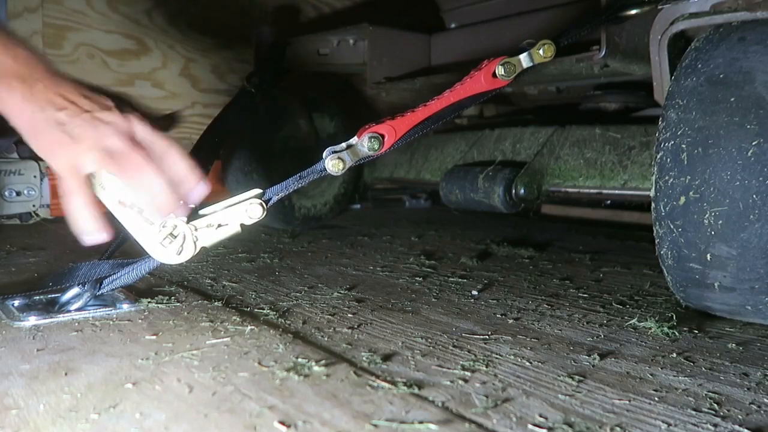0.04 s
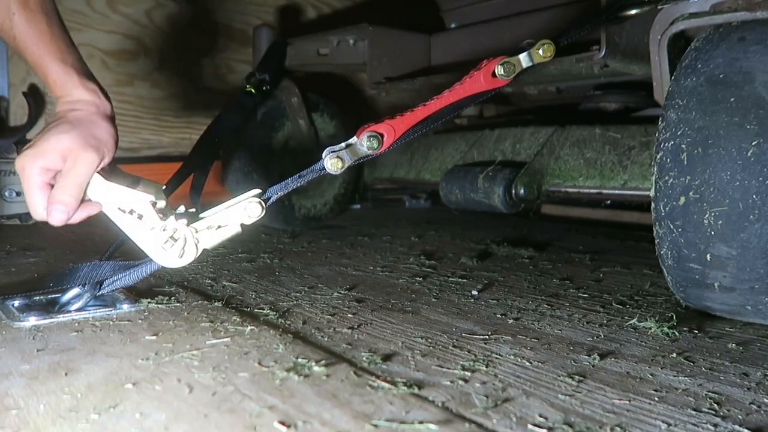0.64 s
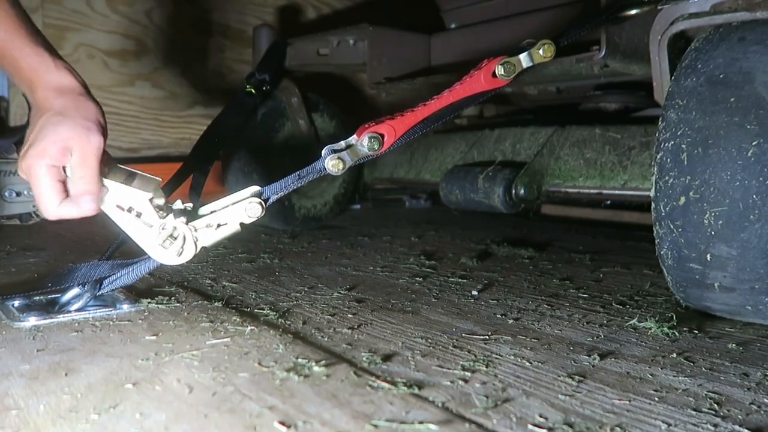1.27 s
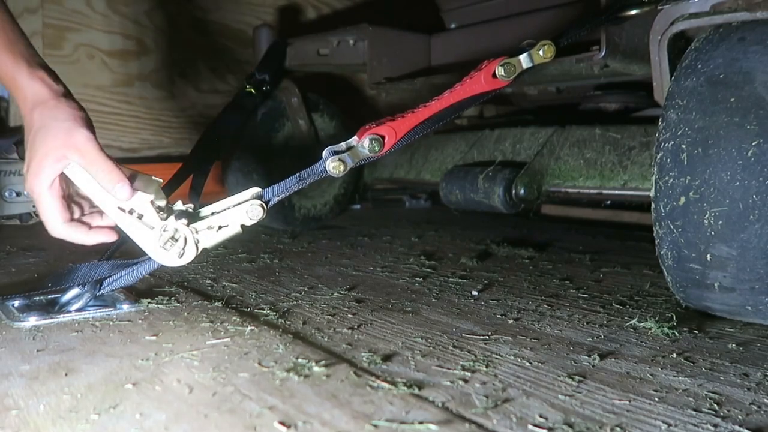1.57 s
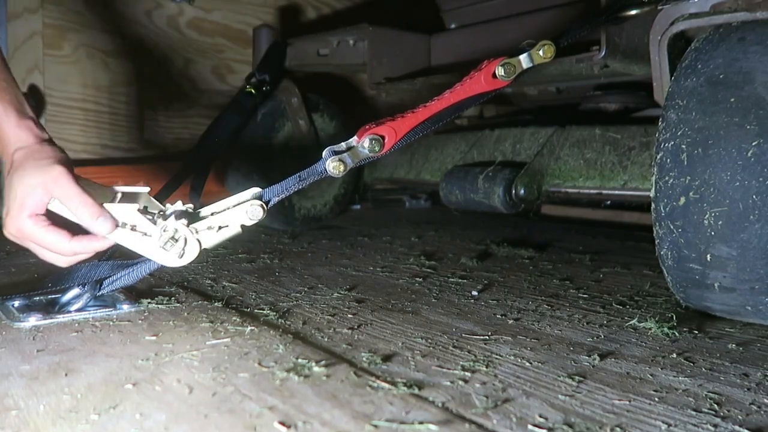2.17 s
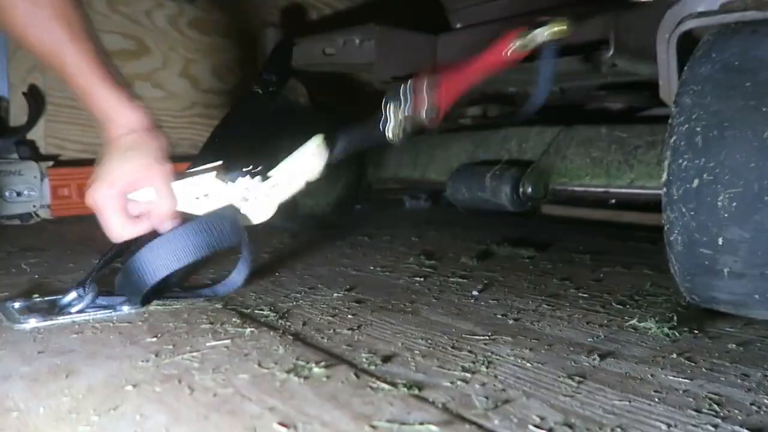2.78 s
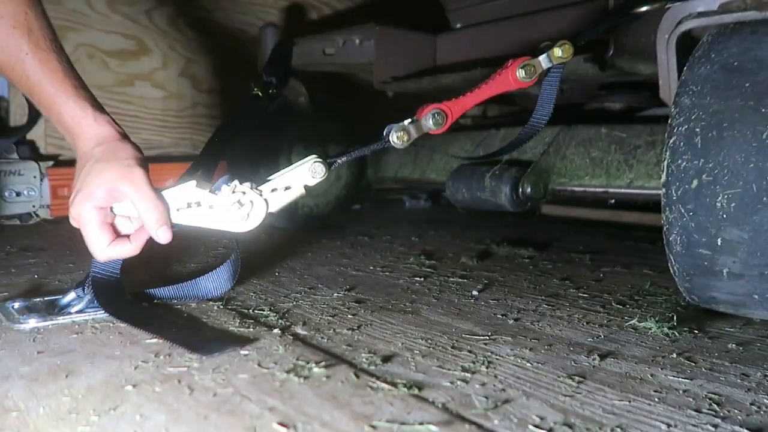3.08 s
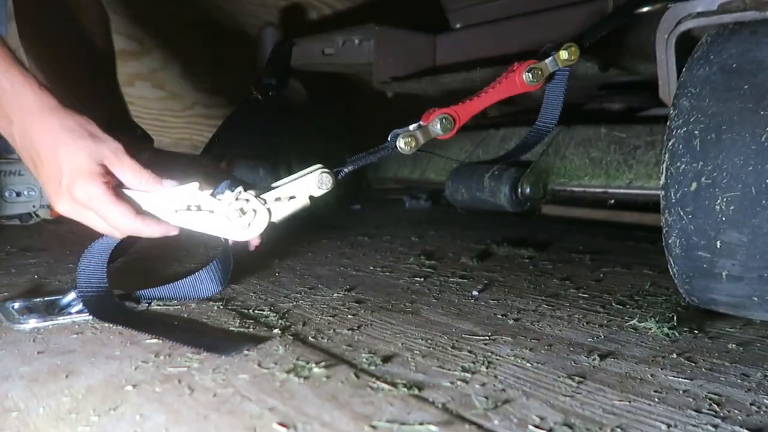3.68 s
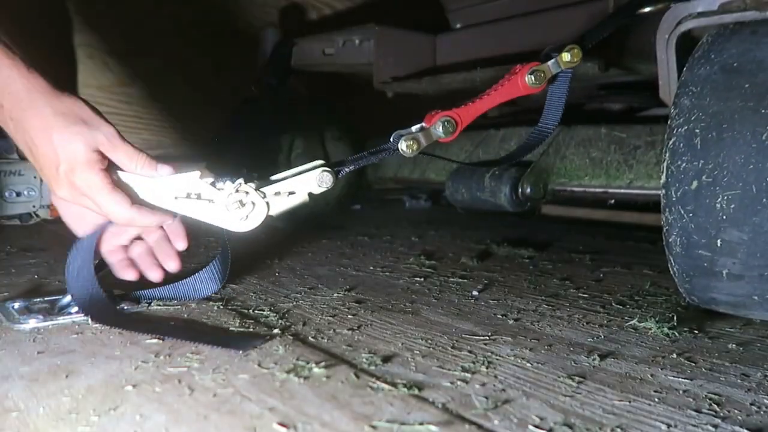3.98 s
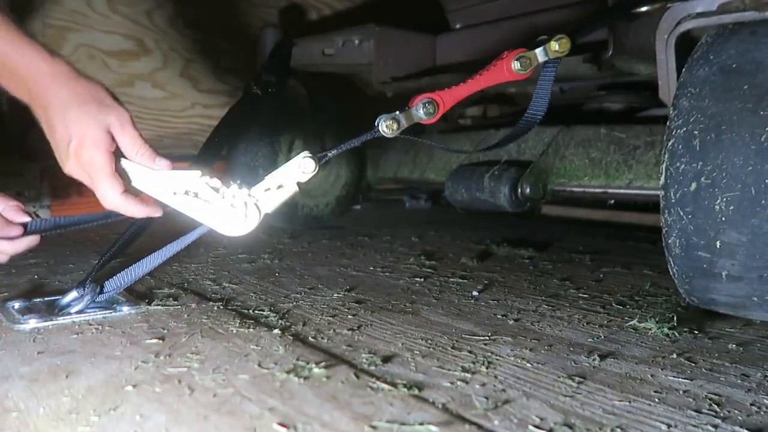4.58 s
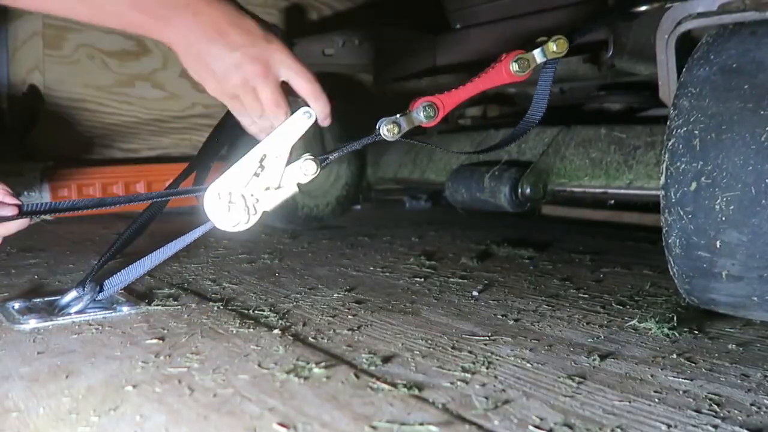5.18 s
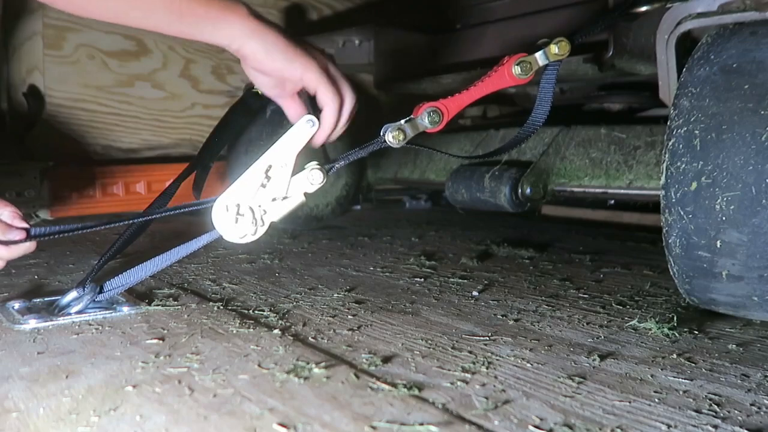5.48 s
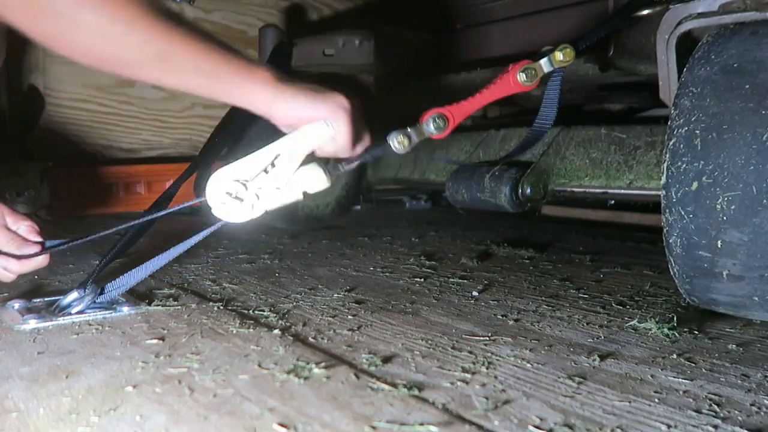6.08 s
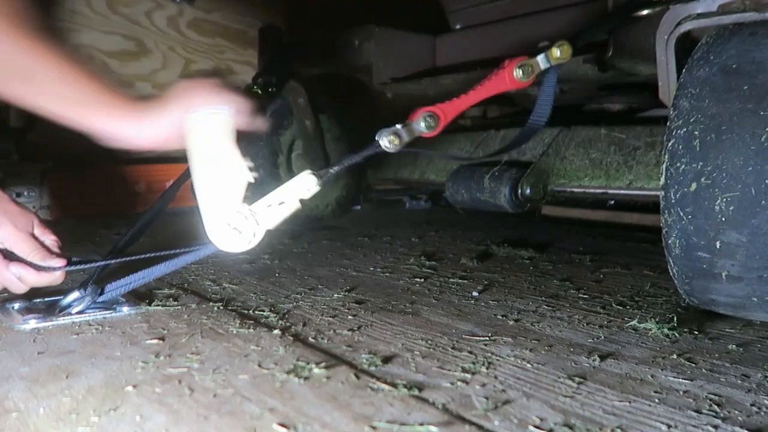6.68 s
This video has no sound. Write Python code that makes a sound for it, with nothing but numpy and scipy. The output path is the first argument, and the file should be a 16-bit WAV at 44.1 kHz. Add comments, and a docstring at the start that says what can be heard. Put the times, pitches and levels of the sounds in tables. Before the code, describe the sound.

Sharp steel snaps and wooden floor thumps, one loud bang as a tie-down lets go, then uneven ratchet clicks in an enclosed trailer.

```python
"""Ratchet strap in a plywood trailer

Close up, a loaded steel buckle snaps and thumps the floor, then lets go with a boom. Webbing rasps
through, loose hooks tap, and the pawl clatters over the teeth as the strap is cranked tight again,
all in short, boxy echoes over a low rumble. The boom overloads the microphone and trips its wind
filter; the gain ducks after the hardest blows."""
import sys
import numpy as np
from scipy import signal
from scipy.fft import rfft, irfft
from scipy.io import wavfile
from scipy.ndimage import uniform_filter1d

SR = 44100
rng = np.random.default_rng(int(sys.argv[2]) if len(sys.argv) > 2 else 0)


def store_wav(level_fs):
    """Save 16-bit WAV to argv[1]."""
    pcm = np.round(np.clip(np.atleast_2d(level_fs), -1, 1) * 32767)
    wavfile.write(sys.argv[1], SR, pcm.T.astype(np.int16))


N = 306054
HIT_SAMPLES = 16384
LEAD_S = 0.011  # the rising hiss just before each steel hit

# pawl dropping over a tooth: t/s, level/dB, relative clunk/dB, relative rattle/dB, knock f/Hz
PAWL_DROPS = [(4.4468,-17,-29.5,-20,3180), (4.7515,-17,-27.5,-31,2700), (4.7616,-9,-41,-3,3540),
              (4.906,-6.5,-21.5,-28.5,3450), (4.9112,2,-38,-18,3620), (5.0131,-9,-33.5,-16,2880),
              (5.0812,-7,-31.5,-17.5,3030), (5.2053,-8,-33,-18.5,3080), (5.7911,-4,-36,-8.5,3060),
              (5.8232,-12,-20,-9,3660), (5.8302,-12,-39,3,3730), (5.8492,-4,-39,-5.5,3230),
              (6.0718,-5.5,-31.5,-21,3430), (6.1178,-6,-46,-8,2920), (6.1809,-7.5,-41.5,-10.5,2630),
              (6.2871,-8.5,-33,-6.5,4340), (6.3131,-7,-44,-8,3800), (6.3351,-9.5,-43,-7,3080),
              (6.344,-8,-28.5,-1.5,3100), (6.5241,-6,-34,-19.5,3270), (6.575,-6.5,-36.5,-11,3400),
              (6.625,-6.5,-36.5,-23,3200), (6.7525,-7,-32.5,-10.5,3500), (6.789,-6.5,-33,-12,3500),
              (6.8186,-6.5,-34.5,-8,3160)]
# buckle slipping under load: t/s, level/dB, relative bright edge/dB, knock f/Hz
BUCKLE_SLIPS = [(0.6095,-22,-40,3460), (0.9183,-41,-54,2020), (0.9387,-7.5,-39.5,2600),
                (1.3335,-36.5,-25.5,1530), (1.8787,1,-25,2700), (1.8815,-9.5,-23.5,3480),
                (2.2092,-10,-26.5,3650), (2.572,-36.5,-33.5,2620), (2.593,-23,-33,2600),
                (2.613,-10.5,-33.5,1522), (2.6731,1.5,-22.5,3140), (2.6795,-0.5,-22.5,1930)]
# strap jerking the floor anchor: t/s, peak level/dB, gain of the deep modes/dB
ANCHOR_JERKS = [(0.0,-30.5,-20), (0.608,-16.5,-5), (0.652,-25,-16), (0.921,-21,-20), (0.937,-14.5,-9),
                (1.059,-27,-8), (1.186,-25,-11.5), (1.31,-29.5,5), (1.878,-21,7.5), (2.209,-21,-3),
                (2.583,-24.5,-9), (2.611,0.5,-9.5), (2.668,-14,6.5), (2.722,-14.5,9.5), (2.787,-22.5,-14),
                (4.449,-31.5,19), (6.832,-24,16)]
# loose hooks touching the hardware, and a few dull flaps of the strap: t/s, level/dB, hardness/dB
HOOK_TOUCHES = [(0.308,-29,1), (2.8726,-26,7.5), (2.894,-36.5,-30.5), (2.9998,-32,-15.5),
                (3.2291,-45,-19.5), (3.501,-38,-1), (3.6013,-44,-19.5), (3.7648,-36,-2.5), (3.903,-33,-5),
                (4.332,-36.5,4), (4.733,-36,4), (5.3982,-34,11.5), (6,-29.5,19.5), (6.0242,-25,11),
                (6.05,-23,8), (6.481,-27,4), (6.883,-17.5,13.5)]
# tugs on the webbing: fastest moment t/s, run-up/s, level/dB
WEBBING_TUGS = [(2.911,0.037,-53), (3.061,0.21,-55.5), (3.234,.012,-52), (3.309,.03,-65), (3.52,.03,-61),
                (3.61,0.032,-59.5), (3.73,0.036,-63), (3.865,0.029,-57.5), (3.94,0.029,-64),
                (4.019,.05,-65.5), (4.209,0.032,-54), (4.338,.11,-59), (4.436,0.073,-42), (4.6,0.23,-55),
                (4.746,0.04,-43.5), (4.894,0.037,-46), (5.299,.2,-65), (5.59,.015,-56), (5.662,0.024,-66.5),
                (6.49,0.074,-54)]

# ring of the steel handle, frame and pawl: f/Hz, level/dB, t60/s
STEEL_MODES = [(850, -22.5, .17), (2050, -6.5, 0.17), (2680, -6.5, .15), (3060, -5, .17), (3120, -8.5, .15),
               (3460, -1, .15), (4070, -15, .12), (4300, -4, .17), (5600, -5.5, .13), (5800, -8.5, .24),
               (6000, -9.5, .12), (7450, -4.5, 0.27), (7260, -2, 0.14), (8900, -8.5, .16), (9630, -4, .1),
               (10950, 0.5, 0.068)]
# ring of the floor boards: f/Hz, level/dB, t60/s
FLOOR_MODES = [(50.3, -22.5, 1), (93.5, -10, 0.14), (120, -9.5, 0.29), (178.3, -6.5, 0.18),
               (220.9, -3.5, 0.37), (242.4, 5, 0.11), (274.6, -5, 0.11), (296, -3.5, 0.14),
               (348, -16.5, 0.17), (461, -15, 0.3), (530, -24, .2)]
# ring of a free hook: f/Hz, level/dB, t60/s
HOOK_MODES = [(2580, -32, 0.077), (5250, -66, 0.46), (5930, -38.5, 0.065)]

# bright tone of the pawl's contact: f/Hz, level/dB
PAWL_TONE = [(120, -6.5), (300, -9), (690, -9), (960, -6.5), (1500, -11.5), (2400, -3), (3400, 0),
             (4800, -6), (6000, -8), (7300, -9.5), (8600, -13.5), (11000, -9), (12000, -15.5),
             (14500, -18.5)]
# hard tone of the taut buckle's contact: f/Hz, level/dB
BUCKLE_TONE = [(150, -37), (420, 1), (660, -18.5), (920, -2), (1230, -8), (2030, 3.5), (2650, 3), (3500, 4),
               (4600, 0), (5600, -3), (8000, -10), (10400, -8), (14000, -19)]
# duller tone of a loose hook's contact: f/Hz, level/dB
HOOK_TONE = [(120, 3), (380, 18), (900, 10), (1700, 12), (3200, 15), (5000, -4.5), (8000, -25),
             (14000, -40)]
# rasp of the weave on steel: f/Hz, level/dB
WEAVE_TONE = [(120, -10.5), (380, 7), (700, 5), (1500, 1.5), (2600, 0), (4200, -9), (7000, -26),
              (14000, -43.5)]
# tone of the stereo side signal in the trailer: f/Hz, level/dB
SIDE_TONE = [(100, -29.5), (250, -15.5), (500, -5), (1000, -5.5), (2000, -7.5), (4000, 2.5), (8000, 13),
             (13000, 14)]
# background rumble and hiss: f/Hz, level/dB
RUMBLE_TONE = [(20, -13.5), (45, 2.5), (107, 4.5), (150, -4.5), (222, -5), (330, -13), (600, -18.5),
               (1190, -20), (1560, -26.5), (2200, -21.5), (2710, -28.5), (3260, -29.5), (6000, -40),
               (14000, -57)]
# rise and fall of the background: t/s, level/dB
RUMBLE_LEVEL = [(0, -41), (1.8, -44.5), (2.5, -45.5), (2.9, -38.5), (3.3, -58.5), (5.6, -55), (6.94, -55)]


def pawl_clacks(climb_db=-1, rebound_db=1, knock_db=1):
    """The pawl climbs a tooth and drops; a looser handle scrapes more before and chatters more after."""
    track = np.zeros((2, N))
    for start_s, level_db, clunk_db, rattle_db, knock_hz in PAWL_DROPS:
        hit = steel_hit(PAWL_TONE, crack_t60=0.032, ring_db=-34, clunk_db=clunk_db, body_db=-19,
                        edge_db=-22, hiss_db=rattle_db + climb_db, hiss_rise_s=0.013,
                        chatter_db=rattle_db + rebound_db)
        hit *= undb(level_db)
        clack = trailer(hit, wet_db=-0.13, side_db=-13) + knock(hit, knock_hz, knock_db)
        add(track, start_s - LEAD_S, clack)
    return track


def buckle_snaps(clunk_db=-28, clunk_slope=0.54, knock_db=11):
    """A faint rising hiss, then a snap, its ring damped by tension; weaker slips are more dull clunk."""
    track = np.zeros((2, N))
    for start_s, level_db, edge_db, knock_hz in BUCKLE_SLIPS:
        hit = steel_hit(BUCKLE_TONE, crack_t60=0.022, ring_db=-41,
                        clunk_db=clunk_db - clunk_slope * level_db, body_db=-20, edge_db=edge_db,
                        hiss_db=-17.5, hiss_rise_s=0.0062, chatter_db=-21)
        hit *= undb(level_db)
        snap = trailer(hit, wet_db=0.5, side_db=-11) + knock(hit, knock_hz, knock_db)
        add(track, start_s - LEAD_S, snap)
    return track


def steel_hit(tone, crack_t60, ring_db, clunk_db, body_db, edge_db, hiss_db, hiss_rise_s, chatter_db):
    """Steel on steel: a brief rising hiss, a crack, a chatter of tiny rebounds and the buckle's ring."""
    t = seconds(HIT_SAMPLES)
    lead, attack = int(LEAD_S * SR), int(0.02 * SR)
    crack, hiss, grains = rng.standard_normal((3, HIT_SAMPLES))
    hz, mode_db, t60 = np.transpose(STEEL_MODES)[:, :, None]
    # grip and point of contact change from blow to blow, and with them the modes
    detune, grip, phase = rng.standard_normal((3, len(hz), 1))
    decays = undb(mode_db + ring_db + 4 * grip) * fade(t, t60)
    ring = np.sum(decays * np.sin(2 * np.pi * (hz * (1 + 0.009 * detune) * t + phase)), axis=0)
    rebounds = unit(grains ** 5)  # sparse spikes
    force = crack * fade(t, crack_t60) + undb(chatter_db) * rebounds * fade(t, t60=0.075)
    lead_in = undb(hiss_db) * hiss[:lead] * np.exp(-t[:lead][::-1] / hiss_rise_s)
    hit = colour(np.r_[lead_in, force], tone) + np.r_[np.zeros(lead), ring]
    clunk = cut(hit, 1400, "low", order=4)
    body = cut(hit, [1400, 6500], "band", order=4)
    edge = cut(hit, 6500, "high", order=4)
    # balance the three bands by their strength in the attack
    return sum(undb(db) * band / np.std(band[lead:lead + attack])
               for band, db in [(clunk, clunk_db), (body, body_db), (edge, edge_db)])


def knock(hit, hz, gain_db, width=0.042):
    """The contact favours one damped resonance, which the flat steel beams at the microphone."""
    return undb(gain_db) * cut(hit, hz * np.exp([-width, width]), "band", order=1)


def release_boom(jolt_s=2.668, jolt_hz=145, jolt_db=7, slam_s=2.673, slam_db=-4):
    """The freed load jolts the box in one dead, heavy swing, then slams it with a wide bang."""
    track, t = np.zeros((2, N)), seconds(HIT_SAMPLES)
    add(track, jolt_s, undb(jolt_db) * np.sin(2 * np.pi * jolt_hz * t) * fade(t, t60=0.037))
    slam = noise_burst(band_hz=[420, 1000], t60=0.083)
    spread = noise_burst(band_hz=[420, 1000], t60=0.16)
    add(track, slam_s, undb(slam_db) * stereo(slam, spread))
    return track


def floor_thumps(contact_s=0.0015, deep_hz=150, thud_db=-11, swell_s=0.003):
    """Each jerk of the strap gives the floor boards a short push, and they thud and ring."""
    track, t = np.zeros(N), seconds(HIT_SAMPLES)
    push = np.sin(np.pi * np.minimum(t / contact_s, 1))
    swell = 1 - np.exp(-t / swell_s)  # the bending wave spreads over the boards
    for start_s, peak_db, deep_db in ANCHOR_JERKS:
        boards = ringing([(hz, db + deep_db * (hz < deep_hz), t60) for hz, db, t60 in FLOOR_MODES])
        thud = undb(thud_db) * noise_burst(band_hz=[170, 480], t60=0.36)
        thump = convolve((boards + thud) * swell, push)
        add(track, start_s, thump * undb(peak_db) / np.abs(thump).max())
    return track


def hook_taps(clunk_db=-30, edge_db=-33):
    """Light touches of slack hardware and dull flaps of the strap; a harder contact trades clunk for edge."""
    track = np.zeros((2, N))
    for start_s, level_db, hard_db in HOOK_TOUCHES:
        hit = steel_hit(HOOK_TONE, crack_t60=0.025, ring_db=-45.5,
                        clunk_db=clunk_db - hard_db, body_db=-20, edge_db=edge_db + hard_db,
                        hiss_db=-6, hiss_rise_s=0.0055, chatter_db=-8)
        add(track, start_s - LEAD_S, trailer(undb(level_db) * hit, wet_db=1, side_db=-14))
    return track


def hook_ping(start_s=2.875):
    """The swinging hook touches its shackle and rings freely."""
    track = np.zeros(N)
    add(track, start_s, ringing(HOOK_MODES))
    return track


def webbing(hold_from_s=2.9, hold_db=-66.5, stop_t60=0.27, grain_db=3, catch_db=2):
    """The weave rasps over steel in tiny slips; each tug speeds it up, then it slides to rest."""
    t = seconds(N)
    speed = undb(hold_db) * (t > hold_from_s)  # the hand keeps a light pull on the strap
    for fastest_s, run_up_s, level_db in WEBBING_TUGS:
        run_up = np.clip(1 + (t - fastest_s) / run_up_s, 0, 1)
        speed += undb(level_db) * run_up * fade(np.maximum(t - fastest_s, 0), stop_t60)
    slips = rng.standard_normal(N) * undb(grain_db * wander(rate_hz=450) + catch_db * wander(rate_hz=35))
    return unit(colour(slips, WEAVE_TONE)) * speed


def trailer(x, wet_db, side_db):
    """Direct sound and the box around it, in stereo; each call draws its own echoes."""
    mid = x + undb(wet_db) * convolve(x, wall_echoes())
    # the floor just below the buckle scatters sound sideways within 3 ms
    bounce = rng.standard_normal(128) / np.sqrt(128)
    side = undb(wet_db) * convolve(x, wall_echoes()) + undb(0.5) * convolve(x, bounce)
    return stereo(mid, undb(side_db) * colour(side, SIDE_TONE))


def wall_echoes(build_s=0.003, split_hz=2000, low_t60=0.25, high_t60=0.29):
    """Dense reflections from near plywood walls; the treble hangs on a little longer."""
    t, noise = seconds(HIT_SAMPLES), rng.standard_normal(HIT_SAMPLES)
    low = cut(noise, split_hz, "low", order=1)
    tail = low * fade(t, low_t60) + (noise - low) * fade(t, high_t60)
    tail *= 1 - np.exp(-(t / build_s) ** 2)
    return tail / np.sqrt(np.sum(tail ** 2))


def rumble(waver_db=3, side_db=-5):
    """A bed of wavering low rumble with a faint hiss."""
    mid, side = (unit(colour(rng.standard_normal(N), RUMBLE_TONE)) for _ in range(2))
    side = undb(side_db) * colour(side, SIDE_TONE)
    level_db = np.interp(seconds(N), *np.transpose(RUMBLE_LEVEL))
    return stereo(mid, side) * undb(level_db - waver_db * wander(rate_hz=15))


def seconds(samples):
    """Time axis."""
    return np.arange(samples) / SR


def undb(db):
    """Decibels to gain."""
    return 10 ** (np.asarray(db) / 20)


def unit(x):
    """Scale to rms 1."""
    return x / np.sqrt(np.mean(x ** 2))


def stereo(mid, side):
    """Mid and side to left and right."""
    return np.array([mid + side, mid - side])


def fade(t, t60):
    """Exponential decay by 60 dB in t60."""
    return np.exp(-np.log(1000) * t / t60)


def ringing(modes):
    """Struck modes as decaying sines."""
    t = seconds(HIT_SAMPLES)
    return sum(undb(db) * np.sin(2 * np.pi * hz * t) * fade(t, t60) for hz, db, t60 in modes)


def noise_burst(band_hz, t60):
    """A band of noise that dies away."""
    noise = cut(rng.standard_normal(HIT_SAMPLES), band_hz, "band")
    return unit(noise) * fade(seconds(HIT_SAMPLES), t60)


def wander(rate_hz, points=4096):
    """Random drift with a spread near 1."""
    return np.interp(seconds(N) * rate_hz, np.arange(points), rng.standard_normal(points))


def convolve(x, response):
    """Apply an impulse response, keeping the length."""
    return signal.fftconvolve(x, response)[:len(x)]


def colour(x, tone, size=4096):
    """Minimum-phase EQ from rows of f/Hz, level/dB, joined on a log-frequency axis."""
    tone_hz, tone_db = np.transpose(tone)
    hz = np.maximum(np.fft.rfftfreq(size, 1 / SR), 1)
    gain = undb(np.interp(np.log(hz), np.log(tone_hz), tone_db))
    cepstrum = irfft(np.log(gain))
    cepstrum[1:size // 2] *= 2
    cepstrum[size // 2 + 1:] = 0
    return convolve(x, irfft(np.exp(rfft(cepstrum))))


def cut(x, hz, kind, order=2):
    """Butterworth filter."""
    return signal.sosfilt(signal.butter(order, hz, kind, fs=SR, output="sos"), x)


def add(track, start_s, sound):
    """Mix a sound in at a time."""
    start = int(round(start_s * SR))
    track[..., start:start + sound.shape[-1]] += sound[..., :N - start]


def scene():
    """Buckle, hooks, webbing and floor in the trailer, over the rumble."""
    hardware = buckle_snaps() + pawl_clacks() + hook_taps()
    strap = trailer(webbing() + hook_ping(), wet_db=-5.5, side_db=-28)
    floor = trailer(floor_thumps(), wet_db=-3.5, side_db=-9.5)
    return hardware + strap + floor + release_boom() + rumble()


def microphone_port(x, low_cut_hz=38, peak_hz=12740, notch_hz=12980, lift=1.5):
    """No deep bass, and a narrow cavity resonance with a null just above it."""
    x = cut(x, low_cut_hz, "high", order=4)
    x = x + lift * signal.lfilter(*signal.iirpeak(peak_hz, Q=45, fs=SR), x)
    return signal.lfilter(*signal.iirnotch(notch_hz, Q=40, fs=SR), x)


def wind_filter(x, bass_hz=300, threshold=0.35, lag_s=0.22, corner_hz=420):
    """Heavy bass counts as wind: a moment later a low cut switches in and stays."""
    t = seconds(N)
    heavy = np.abs(cut(x.mean(axis=0), bass_hz, "low")) > threshold
    tripped = np.maximum.accumulate(heavy).astype(float)
    engaged = uniform_filter1d(np.interp(t - lag_s, t, tripped), size=1024)
    return x + engaged * (cut(x, corner_hz, "high", order=1) - x)


def ducking(x, threshold_db=-12, lag_s=0.0017, fall_db_per_s=70, depth=0.45):
    """The gain dips just after a loud blow and creeps back as the held overshoot falls."""
    t = seconds(N)
    power = uniform_filter1d(np.mean(x ** 2, axis=0), size=128)
    over_db = np.maximum(10 * np.log10(np.maximum(power, 1e-12)) - threshold_db, 0)
    held_db = np.maximum.accumulate(over_db + fall_db_per_s * t) - fall_db_per_s * t
    return x * undb(-depth * np.interp(t - lag_s, t, held_db))


def record(dry, top_hz=15100):
    """Microphone port, wind filter, ducking, soft overload on the hardest blows and a steep top cut."""
    x = ducking(wind_filter(microphone_port(dry)))
    rounded = x / (1 + x ** 6) ** (1 / 6)
    return signal.sosfilt(signal.ellip(8, 0.2, 70, top_hz, fs=SR, output="sos"), rounded)


dry = scene()
out = record(dry)
store_wav(out)
```